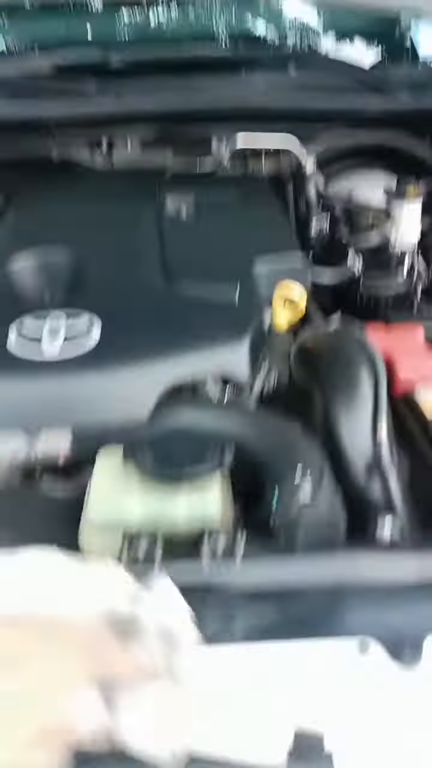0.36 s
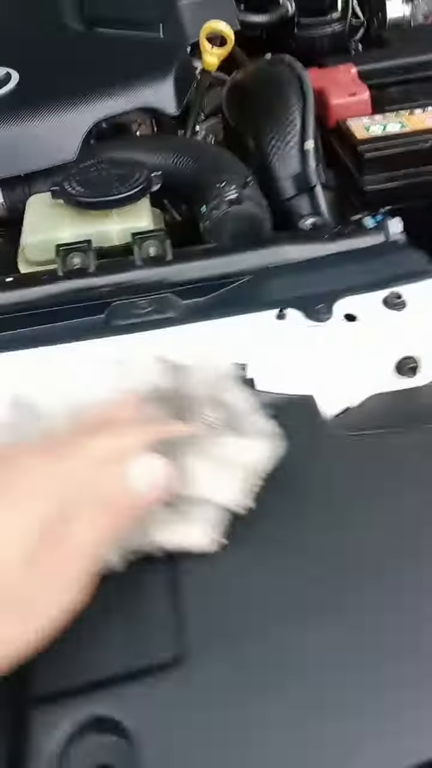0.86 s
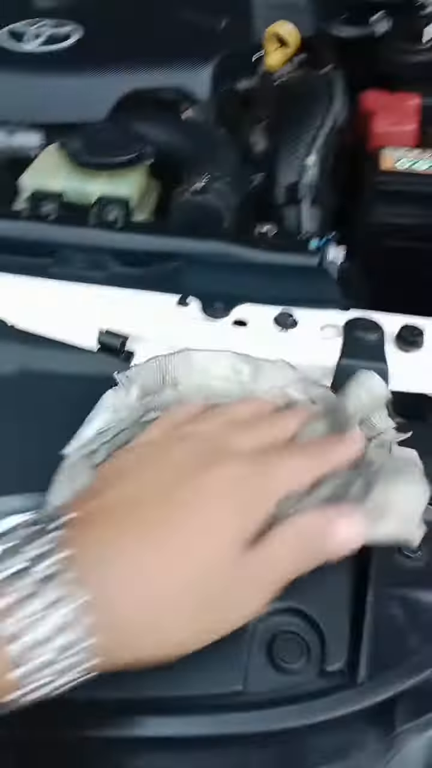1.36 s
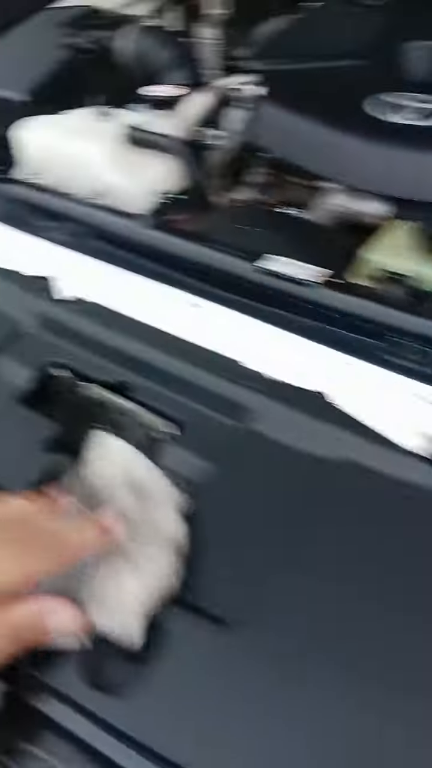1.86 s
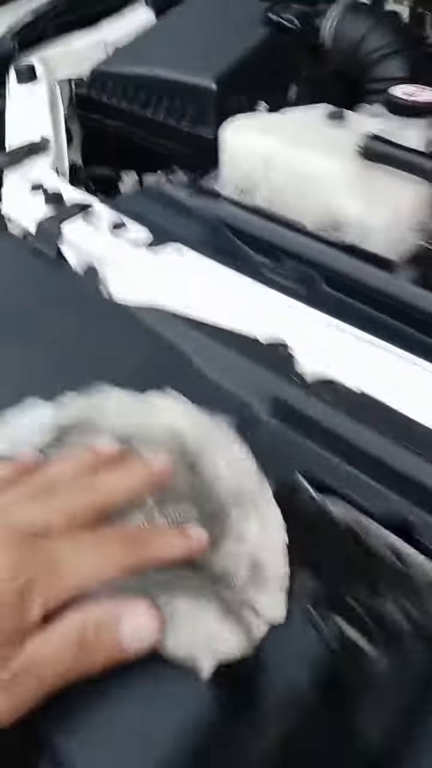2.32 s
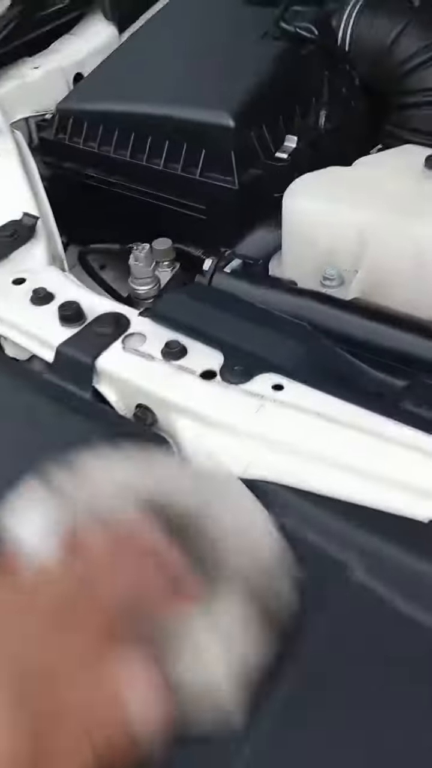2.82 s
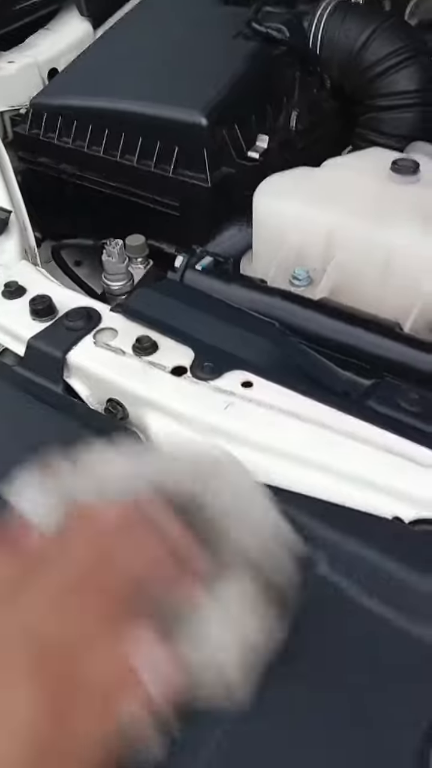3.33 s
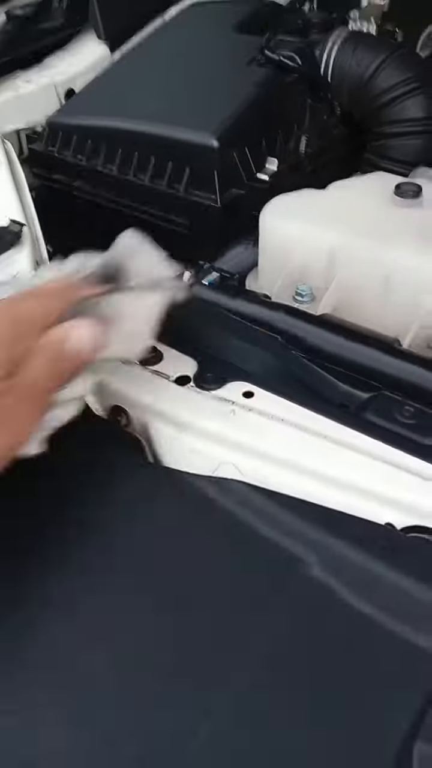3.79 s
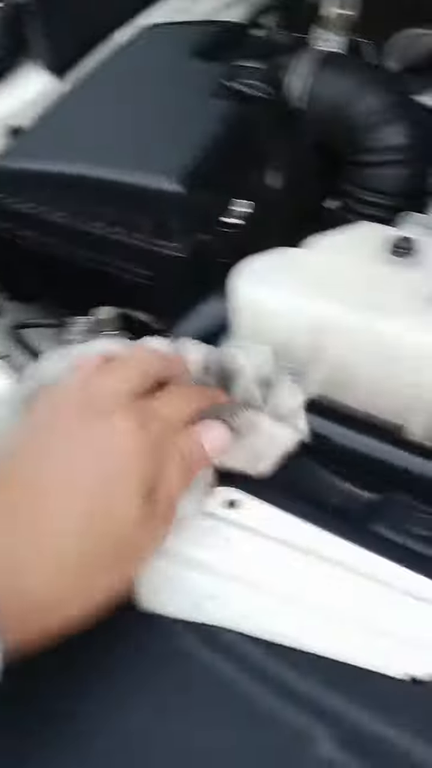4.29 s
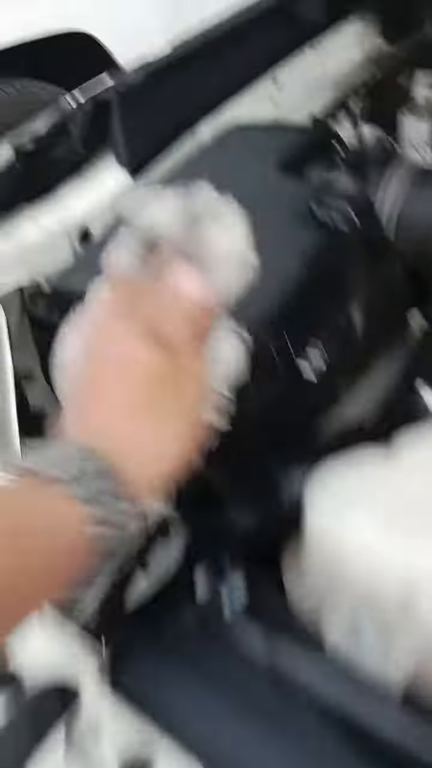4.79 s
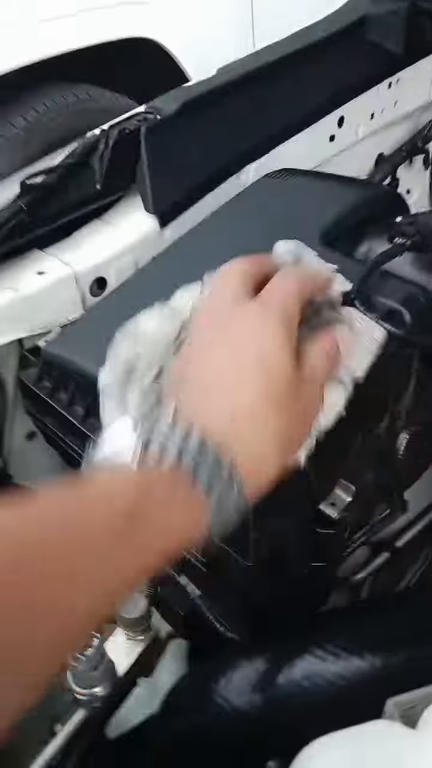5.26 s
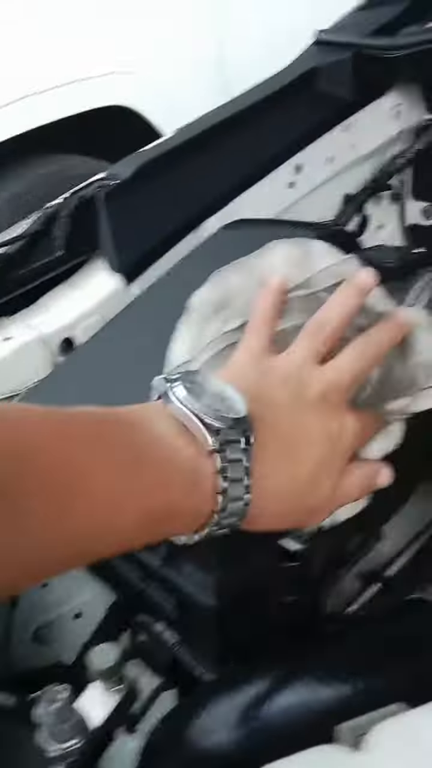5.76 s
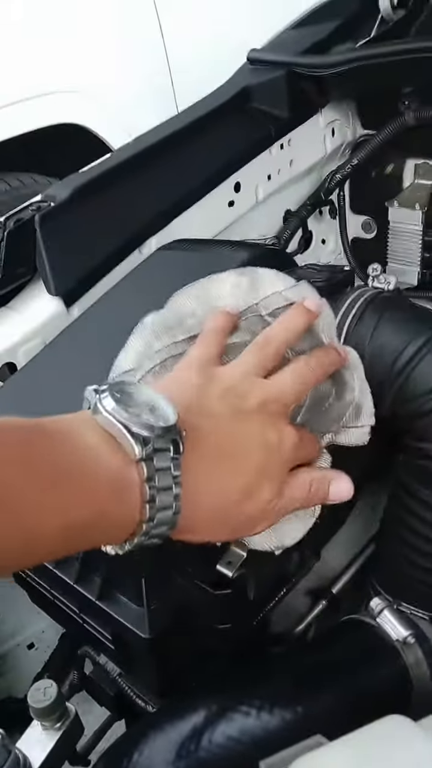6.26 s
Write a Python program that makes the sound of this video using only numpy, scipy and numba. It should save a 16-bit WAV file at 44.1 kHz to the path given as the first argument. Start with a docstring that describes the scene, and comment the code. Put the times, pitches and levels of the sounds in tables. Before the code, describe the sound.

A hand with a loose steel watch strap rubs cloth over hard plastic, heard close on one microphone outdoors. One soft wipe, a lull, a low padded bump, then brisk, scratchy back-and-forth rubs with a slight hollow panel tone. A few weaker rubs lead to a loud bright click and small knock. The rest is quiet: faint metallic ticks, whispery fibres, light handling thumps and far traffic rumble.

```python
"""A hand wipes a cloth over plastic covers in an open engine bay, outdoors, on one mono microphone.
Fibres catching and slipping are random clicks through resonances of the plastic; the panel rings along.
The hand bumps the cover now and then: short noisy contacts shake its modes. A steel watch strap ticks
in short bright decaying sines with a rustle of noise after them. Far traffic rumbles below in slowly
flickering bands of noise, with a thin whine and short low thumps of handling."""
import sys
import numpy as np
from scipy import signal
from scipy.io import wavfile
from numba import njit

SR = 44100
rng = np.random.default_rng(int(sys.argv[2]) if len(sys.argv) > 2 else 0)


def output_pcm(signal):
    """Save a mono or channel-first signal as 16-bit PCM at the path in sys.argv[1].

    Samples are clipped to [-1, 1] before scaling.
    """
    pcm = np.clip(np.atleast_2d(signal).T, -1, 1) * 32767
    wavfile.write(sys.argv[1], SR, np.round(pcm).astype(np.int16))


def invert_db(x):
    """Field ratio 10**(x/20) for x, a level in decibels (scalar or array-like)."""
    u = np.asarray(x, float) / 20
    return 10 ** u


N = 281358


def rms_one(x):
    """Scales a sound to rms 1."""
    return x / np.sqrt(np.mean(x ** 2) + 1e-20)


def peak_one(x):
    """Scales a sound to peak 1."""
    return x / np.max(np.abs(x))


def in_time(rows):
    """Joins the rows of a table by straight lines over the scene; the first column is the time in s."""
    s, *columns = np.transpose(rows)
    return [np.interp(np.arange(N) / SR, s, column) for column in columns]


def drift(rate_hz):
    """Slow chance with rms 1: noise through two equal low-pass poles at rate_hz, one value per 128 samples."""
    r = np.exp(-2 * np.pi * rate_hz * 128 / SR)
    settle = 800
    noise = rng.standard_normal(N // 128 + 2 + settle)
    slow = rms_one(signal.lfilter([1], [1, -2 * r, r * r], noise)[settle:])
    return np.interp(np.arange(N) / 128, np.arange(len(slow)), slow)


def cut(x, hz, kind, order=2):
    """A Butterworth filter."""
    return signal.sosfilt(signal.butter(order, hz, kind, fs=SR, output="sos"), x)


def resonate(x, hz, width_hz):
    """A two-pole resonance with gain 1 on top."""
    r = np.exp(-np.pi * width_hz / SR)
    gain = (1 - r * r) / 2
    return signal.lfilter(np.array([1, 0, -1]) * gain, [1, -2 * r * np.cos(2 * np.pi * hz / SR), r * r], x)


def ring(force, hz, t60):
    """A unit click sets a decaying sine of starting height 1 ringing."""
    r, w = invert_db(-60 / (t60 * SR)), 2 * np.pi * hz / SR
    return signal.lfilter([0, np.sin(w)], [1, -2 * r * np.cos(w), r * r], force)


@njit
def glide(x, hz, r, sr):
    """A resonance whose centre moves; r is its pole radius."""
    y = np.zeros(len(x))
    for i in range(2, len(x)):
        y[i] = x[i] - x[i - 2] + 2 * r * np.cos(2 * np.pi * hz[i] / sr) * y[i - 1] - r * r * y[i - 2]
    return y


# far traffic: start_s, rumble_db (below 200 Hz), murmur_db (200 to 700 Hz)
TRAFFIC = [(0, -59, -59.5), (.3, -60, -61.5), (.6, -64, -67.5), (1.2, -68.5, -66), (1.9, -68, -71),
           (2.6, -63, -63.5), (3.3, -61.5, -67), (3.9, -65, -65.5), (4.5, -62.5, -67), (5.1, -68.5, -70.5),
           (5.7, -65, -70), (6.38, -65, -72.5)]
# short low thumps as the hand or the microphone is handled: peak_s, peak_db
THUMPS = [(.39, -60.5), (.72, -58.5), (.86, -55.5), (2.04, -62), (2.36, -50), (3.33, -57), (3.47, -62),
          (3.68, -60), (4.189, -54), (4.43, -57.5), (4.63, -65), (5.169, -57), (5.821, -56.5), (6.23, -64)]
THUMP_S = 0.025   # half width
# colour of the far noise: pitch_hz, level_db (relative, within rumble, murmur or air)
AIR_COLOUR = [(24, -53.5), (40, -20.5), (81, -7), (144, -15), (290, -13.5), (320, -21), (345, -12.5),
              (646, -21.5), (1680, -25), (2210, -40.5), (2910, -37.5), (4030, -48), (5050, -44),
              (8550, -49), (16000, -80)]
AIR_DB = -73.5   # level of the air above 700 Hz
WHINE_HZ, WHINE_WIDTH_HZ, WHINE_DB = 2840, 42.8, -87


def outdoors(patchy_db=3.0):
    """Far noise in flickering third-octave bands, the lowest also shaped into thumps; a whine of uneven level."""
    t = np.arange(N) / SR
    rumble_db, murmur_db = in_time(TRAFFIC)
    thumps = sum(invert_db(db) * np.exp(-((t - s) / THUMP_S) ** 2) for s, db in THUMPS)
    colour_hz, colour_db = np.transpose(AIR_COLOUR)
    edges = 25 * 2 ** np.arange(0, 9.4, 1 / 3)
    white = rng.standard_normal((2, N))   # neighbouring bands take turns at the two noises
    groups = np.zeros((3, N))
    for k, (low, high) in enumerate(zip(edges, edges[1:])):
        hz = np.sqrt(low * high)
        level_db = np.interp(np.log(hz), np.log(colour_hz), colour_db)
        band = cut(white[k % 2], [low, high], "band")
        groups[int(hz > 200) + int(hz > 700)] += invert_db(level_db + patchy_db * drift(10)) * band
    low_noise, murmur, air = (rms_one(group) for group in groups)
    whine = resonate(resonate(white[0], WHINE_HZ, WHINE_WIDTH_HZ), WHINE_HZ, WHINE_WIDTH_HZ)
    whine = invert_db(WHINE_DB + 3.3 * drift(8.9)) * rms_one(whine)
    rumble_and_thumps = np.hypot(invert_db(rumble_db), thumps) * low_noise
    return rumble_and_thumps + invert_db(murmur_db) * murmur + invert_db(AIR_DB) * air + whine


# strap links touching: start_s, peak_db (before the high-pass), low_modes_db (lift of the low link modes)
TICKS = [(0.013, -23.5, -12), (0.39, -54.5, 3), (0.8456, -58, -1), (1.1372, -40.5, -8), (1.3593, -48, -17),
         (2.3024, -60, -10), (2.3126, -42, -18), (2.4167, -40, -8), (2.4256, -18, -9), (2.9796, -39.5, -22),
         (3.7434, -60, -30), (3.8653, -42, 7), (3.957, -30.5, -3), (4.0164, -42, -3), (4.024, -58, -4),
         (4.201, -35, -2), (4.3397, -41.5, -11), (4.3735, -36.5, -11), (4.3883, -10, -12),
         (4.4867, -52, -1), (4.4995, -63, 1), (4.5331, -67, -10), (4.561, -63, -20), (4.6325, -41, -24),
         (4.6838, -44, -29), (4.6964, -64, -21), (4.916, -49, -7), (5.0589, -60, -2), (5.178, -44, -12),
         (5.319, -60, -2), (5.353, -56, -21), (5.3604, -57, -21.5), (5.515, -50, -5), (5.5582, -49, -8),
         (5.5817, -39, -1), (5.591, -35.5, -21), (5.595, -36.5, -14), (5.675, -43, 1), (5.679, -35.5, -15),
         (5.684, -39, -7), (5.8268, -73, -1)]
# modes of a link: pitch_hz, level_db (relative), t60_s (before RING_STRETCH)
LINK_LOW = [(5100, -7, 0.0077), (5840, 1.5, 0.012), (6760, 10, 0.0067), (7630, 1.5, 0.00527)]
LINK_HIGH = [(9000, -11.5, 0.0042), (10320, -14.5, 0.0049), (11470, -3.5, 0.0055), (12110, 1.5, 0.00458),
             (12860, -1.5, 0.0044), (14260, 2, 0.0057), (15290, -7, 0.008)]
TICK_LENGTH, RING_STRETCH = 3000, 0.92   # samples; factor on every t60
RUSTLE_DB, RUSTLE_REF_DB = -58, -45   # rustle level after a tick of the reference peak
RUSTLE_FOLLOWS, RUSTLE_T60_S = 0.45, 0.075   # dB of rustle per dB of tick; decay


def strap():
    """Each touch of two links rings short bright modes; loose neighbours rustle after it."""
    out, t = np.zeros(N + TICK_LENGTH), np.arange(TICK_LENGTH) / SR
    luck = rng.normal(0, 1, (len(TICKS), 10))
    noise = rng.standard_normal((len(TICKS), TICK_LENGTH))
    low_noise, high_noise = resonate(noise, 8600, 910), cut(noise, 5900, "high")
    rise = 1 - np.exp(-t / 0.00044)
    for k, (s, peak_db, low_db) in enumerate(TICKS):
        modes = [(hz, db + low_db, t60) for hz, db, t60 in LINK_LOW] + LINK_HIGH[:6]   # ten modes sound
        tick = 0
        for (hz, db, t60), chance in zip(modes, luck[k]):
            # chance moves both level and pitch of a mode
            decay = invert_db(db + 6.3 * chance - 60 * t / (t60 * RING_STRETCH))
            tick = tick + decay * np.sin(2 * np.pi * hz * (1 + 0.012 * chance) * t)
        rustle_db = RUSTLE_DB + RUSTLE_FOLLOWS * (peak_db - RUSTLE_REF_DB)
        rustle = high_noise[k] + invert_db(low_db + 8.0) * low_noise[k]
        rustle = invert_db(rustle_db - 60 * t / RUSTLE_T60_S) * rustle
        out[round(s * SR):][:TICK_LENGTH] += invert_db(peak_db) * peak_one(rise * tick) + rise * rustle
    return cut(out[:N], 4080, "high")


BUMP_LENGTH, CONTACT_RISE_S = 16000, 0.00072   # samples; s
PUSH_HZ, PUSH_T60_S = 75.3, 0.387
CRACK_DB = -9   # re the knock's peak


def blows(rows, modes, thud_db):
    """A sharp first touch and a rough contact of a few ms shake the modes; the whole cover gives a low push."""
    out, t = np.zeros(N + BUMP_LENGTH), np.arange(BUMP_LENGTH) / SR
    luck = rng.normal(0, 1, (len(rows), len(modes)))
    first_touch = 0.13 * np.exp(-t * SR)
    for (s, peak_db, contact_s, bright_db, push_db), chances in zip(rows, luck):
        rough = rng.standard_normal(BUMP_LENGTH) * np.exp(-(t / contact_s) ** 2)
        rough = rough * (1 - np.exp(-t / CONTACT_RISE_S))
        force = rough / np.sqrt(np.sum(rough ** 2)) + first_touch
        knock = 0
        for (hz, db, t60), chance in zip(modes, chances):
            # a harder contact lifts the upper modes
            mode_db = db + bright_db * np.log2(hz / 1000) + 1.4 * chance
            knock = knock + invert_db(mode_db) * peak_one(ring(force, hz, t60))
        knock = peak_one(cut(knock, 216, "high", order=4))
        # the contact itself is heard as a broad dry crack and a dull thud of cloth
        crack = peak_one(cut(cut(force, 885, "high"), 5650, "low", order=4))
        crack = invert_db(CRACK_DB + 1.2 * min(bright_db, 0)) * crack
        thud = invert_db(thud_db) * peak_one(cut(force, [420, 1500], "band"))
        push = invert_db(push_db - 60 * t / PUSH_T60_S) * np.sin(2 * np.pi * PUSH_HZ * t)
        push = (1 - np.exp(-t / 0.034)) * push
        out[round(s * SR):][:BUMP_LENGTH] += invert_db(peak_db) * (knock + crack + thud) + push
    return out[:N]


# the hand meets the middle of the cover (BUMPS) or its stiff edge (KNOCKS):
# start_s, peak_db (of the modes), contact_s, brightness_db (per octave), push_db (before its slow rise)
BUMPS = [(2.245, -38, 0.0055, 2, -54), (2.2526, -17.5, 0.0099, 1, -36), (2.273, -29, 0.0069, 0, -55),
         (2.285, -28, 0.0093, -1, -32.5), (2.293, -32, 0.0068, -13, -58), (2.3, -33.5, 0.0064, -2, -54),
         (2.314, -35.5, 0.013, -5, -55)]
KNOCKS = [(3.848, -51.5, 0.0089, 4, -57), (4.269, -61, .005, 4, -64), (4.3582, -21, 0.0018, 7.5, -54),
          (4.362, -23, .010, -0.5, -62), (4.378, -35.5, .005, -3, -62.5), (4.585, -74, .005, -7, -63),
          (4.891, -53.5, 0.0057, 8, -61)]
# modes of the cover's middle and of its edge: pitch_hz, level_db (relative), t60_s (for a blow)
PANEL = [(251, -9, 0.06), (312, -6.5, 0.075), (487, -5.5, 0.04), (542, 3.5, 0.045), (618, -10.5, 0.029),
         (725, -4.5, 0.042), (913, -9.5, 0.065), (1080, 4, 0.02), (1350, 3.5, 0.03), (1652, -2.5, 0.024),
         (1976, -7.5, 0.037), (3040, -9, 0.014), (3370, -1, 0.019), (5040, -15, 0.031), (5460, -11, 0.037),
         (6170, -8, 0.0055), (7700, -42, .02)]
EDGE = [(229, -26, .04), (322, -16, 0.055), (620, -7, 0.071), (750, -1.5, 0.0295), (1110, 0, 0.064),
        (1290, -7, .04), (1500, -12, .02), (1813, -7, .03), (2060, -11.5, .02), (2900, -15.5, .015),
        (3420, -13.5, .015), (4720, -20.5, .015), (5830, -14, 0.013), (6060, -15, 0.0095)]
LOW_BODY_DB = 3   # lift of the four lowest panel modes
THUD_DB, EDGE_THUD_DB = -13.5, -21.5   # re the knock's peak


def bumps():
    """Mid-panel blows favour the four lowest modes; the edge has modes of its own."""
    middle = [(hz, db + LOW_BODY_DB, t60) for hz, db, t60 in PANEL[:4]] + PANEL[4:]
    return blows(BUMPS, middle, THUD_DB) + blows(KNOCKS, EDGE, EDGE_THUD_DB)


def slips(per_s, spread_db, clump_db):
    """Fibres catch and let go at random, in clumps, with a few large jerks."""
    sizes = invert_db(spread_db * np.minimum(rng.exponential(1, N), 5)) * rng.choice([-1, 1], N)
    happens = rng.random(N) < per_s / SR
    return rms_one(sizes * happens * invert_db(clump_db * drift(60)))


# strokes of the cloth: start_s, fastest_s, stop_s (at least RELEASE_S after fastest_s),
# rasp_db, panel_db (re rasp), fibres_db (re rasp)
STROKES = [(-.06, 0.16, 0.46, -48.5, -7.5, -7), (0.559, 0.56, 0.65, -62.5, -25, -29),
           (.66, 0.692, 0.7, -70, 0, -2), (0.732, 0.806, 0.89, -64, -21, -14),
           (0.824, 0.865, 0.95, -65.5, -17, -11), (.92, 1.016, 1.47, -68, -3, -13),
           (1.06, 1.136, 1.25, -64.5, -6, -8), (1.197, 1.344, 1.55, -73.5, 4, 5.5),
           (1.34, 1.46, 1.91, -61.5, -12, -3.5), (1.536, 1.727, 1.73, -63.5, -3, -9),
           (2.25, 2.515, 2.625, -40, -8.5, -9), (2.56, 2.63, 2.735, -51, -9.5, -9.5),
           (2.695, 2.881, 2.96, -38.5, -7.5, -10.5), (2.967, 3.092, 3.194, -35, -11, -10.5),
           (3.236, 3.377, 3.48, -38, -9.5, -9.5), (3.496, 3.594, 3.68, -36.5, -21, -7),
           (3.836, 3.859, 3.93, -51.5, -6.5, -14), (3.884, 3.975, 4.05, -47.5, -19, -9.5),
           (4.076, 4.179, 4.23, -47, -13.5, -9.5), (4.252, 4.346, 4.446, -48, -10.5, -8.5),
           (4.355, 4.365, 4.39, -46, -9, -27), (4.387, 4.443, 4.6, -70.5, 11, -24),
           (4.45, 4.49, 4.1, -60.5, -1.5, -26), (4.58, 4.594, 4.38, -71, 16, -7),
           (4.654, 4.695, 4.77, -65, -3, -29), (4.88, 4.92, 4.96, -65, -8, -5),
           (4.94, 4.99, 5.08, -67, -8, -10), (5.285, 5.31, 5.36, -65, -2.5, -16),
           (5.34, 5.365, 5.41, -67, -2.5, -6), (5.81, 5.845, 5.89, -67, 1.5, -12),
           (5.765, 5.781, 4.6, -65, 2.5, -30), (5.97, 5.995, 5.9, -81, -6, -4),
           (6.078, 6.079, 6.2, -69.5, 2, -28), (6.191, 6.212, 6.26, -68.5, 0.5, -16),
           (6.292, 6.298, 6.7, -73.5, 4, -13)]
SPEED_POWER, PANEL_SPEED_POWER, FIBRE_SPEED_POWER = 1.73, 2.26, 1.9   # sound grows as these powers of speed
RELEASE_S, TREMBLE_DB = 0.004, 0.5   # the cloth coasts after the hand stops; the hand is unsteady


def strokes():
    """The hand speeds up and slows down along quarter sines; rasp, panel, fibres follow as powers of speed."""
    t, power = np.arange(N) / SR, np.zeros((3, N))
    for start, fastest, stop, rasp_db, panel_db, fibre_db in STROKES:
        stop = max(stop, fastest + RELEASE_S)
        now = slice(max(round(start * SR), 0), round(stop * SR))
        speed = np.sin(np.pi / 2 * np.interp(t[now], [start, fastest, stop], [0, 1, 0]))
        levels = np.array([speed ** SPEED_POWER,
                           invert_db(panel_db) * speed ** PANEL_SPEED_POWER,
                           invert_db(fibre_db) * speed ** FIBRE_SPEED_POWER])
        power[:, now] += (invert_db(rasp_db) * levels) ** 2
    r = np.exp(-1 / (RELEASE_S * SR))
    coasting = signal.lfilter([1 - r], [1, -r], power)
    return np.sqrt(np.maximum(power, coasting)) * invert_db(TREMBLE_DB * drift(29.0))


LIGHT_DB, FIRM_DB = -59, -44   # rub levels of a fully light and a fully firm touch
LEAST_FIRM_SHARE = 0.32   # the touch is never lighter than this
RIBBED_UNTIL_S, RIBBED_FIRM_SHARE = .5, .45   # the first wipe crosses a part that keeps its narrow modes


def firmness(rub, ribbed):
    """The harder the cloth presses, the more the broad rasp takes over from the narrow modes."""
    firm = np.clip((20 * np.log10(rub) - LIGHT_DB) / (FIRM_DB - LIGHT_DB), 0, 1)
    firm = np.maximum(firm, LEAST_FIRM_SHARE)
    return np.where(ribbed, np.minimum(firm, RIBBED_FIRM_SHARE), firm)


HOP, HOLD_S = 0.025, .06   # spread of the pitch steps as a share of the pitch; mean hold


def hopping(force, hz, width_hz):
    """A narrow mode with random stepped pitch; its resonance is applied twice."""
    hops = np.cumsum(rng.random(N) < 1 / (HOLD_S * SR))
    centre = hz * (1 + HOP * rng.standard_normal(2000)[hops])
    r = np.exp(-np.pi * width_hz / SR)
    return ((1 - r * r) / 2) ** 2 * glide(glide(force, centre, r, SR), centre, r, SR)


def through(modes, force, patchy_db, sharpen=resonate):
    """Parallel resonances of alternating sign, each with a slow random level; rms 1."""
    total = 0
    for k, (hz, width_hz, db) in enumerate(modes):
        total = total + (-1) ** k * invert_db(db + patchy_db * drift(10.2)) * sharpen(force, hz, width_hz)
    return rms_one(total)


# broad modes under a firm touch: pitch_hz, width_hz, level_db (relative)
RASP = [(4500, 660, 2), (4840, 360, 6.5), (5524, 504, 8), (6310, 930, 3), (7920, 1600, -13)]
SCUFF = [(1890, 770, -6), (2593, 280, -1), (3145, 580, 1.5), (3710, 550, -4)]
# narrow modes under a light touch: pitch_hz, width_hz (of each of two passes), level_db (relative)
SQUEAKS = [(4720, 120, -8.5), (5136, 150, 0.5), (5380, 70, -3), (5893, 140, -4), (6405, 263, 0.5),
           (6900, 110, -3.5), (7735, 235, -5.5), (7930, 1300, -14.5)]
LOW_SQUEAKS = [(1853, 36, 4.5), (2460, 90, -15), (2900, 430, -5), (3302, 106, 3.5), (3566, 210, -2),
               (3933, 100, -12.5)]


def rasp_and_scuff(force, firm):
    """The slips sound in broad modes under a firm touch, in narrow modes of stepped pitch under a light one."""
    rasp = firm * through(RASP, force, patchy_db=1.0)
    rasp = rasp + (1 - firm) * through(SQUEAKS, force, patchy_db=3.0, sharpen=hopping)
    scuff = firm * through(SCUFF, force, patchy_db=1.5)
    scuff = scuff + (1 - firm) * through(LOW_SQUEAKS, force, patchy_db=6.0, sharpen=hopping)
    return cut(rasp, 2300, "high"), cut(scuff, 4600, "low")


# hiss of the fibres: pitch_hz, width_hz, level_db (relative)
FIBRES = [(8500, 6100, 0), (12200, 1450, 4.5), (15100, 2700, 5)]
LIGHT_FIBRE_HZ, LIGHT_FIBRE_DB = 11500, 4.5   # a light touch favours the whisper of the finest fibres


def fibre_hiss(force, firm):
    """Fibres hiss high up; under a light touch the finest come forward and flicker."""
    hiss = cut(through(FIBRES, force, patchy_db=0.5), 4200, "high", order=4)
    finest = invert_db(LIGHT_FIBRE_DB + 2.6 * drift(12.0)) * cut(hiss, LIGHT_FIBRE_HZ, "high", order=8)
    return firm * hiss + (1 - firm) * (finest + invert_db(-4.5) * hiss)


def panel_answer(force, panel_hz, firm):
    """The panel answers in one wandering mode, joined by its flickering middle modes when pressed; rms 1."""
    wandering_hz = panel_hz * (1 + 0.065 * drift(12.0))
    narrow = rms_one(glide(force, wandering_hz, np.exp(-np.pi * 100 / SR), SR))   # 100 Hz wide
    narrow = narrow * invert_db(3.8 * drift(16.0) - 7.6 * firm)
    # the rubbed middle modes ring longer than after a blow
    broad = rms_one(sum(invert_db(db + 11.0 * np.tanh(drift(9.4))) * ring(force, hz, 1.4 * t60)
                        for hz, db, t60 in PANEL[4:11]))
    both = narrow + invert_db(-8.0 + 7.26 * firm) * broad
    return rms_one(cut(cut(both, 660, "high"), 2400, "low"))


def cover_drone(force):
    """The three lowest panel modes, equally driven by the slips; rms 1."""
    return rms_one(cut(sum(ring(force, hz, t60) for hz, db, t60 in PANEL[:3]), 110, "high"))


# one narrow mode of the plastic sings for a moment under the dragging cloth; the rows at 4.377 s and 4.38 s #
# are the edge ringing on at 615 and 1380 Hz after the knock at 4.358 s: # start_s, length_s, pitch_hz, level_db
# (before its swell and fade)
SINGS = [(0, 0.071, 1420, -60.5), (0.06, 0.079, 3135, -63), (0.084, 0.27, 1400, -56.5),
         (0.124, 0.082, 1990, -64), (0.183, 0.048, 2640, -63), (.22, 0.12, 1630, -60),
         (0.325, 0.11, 2730, -70), (1.038, 0.17, 1283, -68.5), (1.136, 0.031, 4590, -68),
         (1.428, 0.085, 1330, -66), (1.517, 0.15, 1235, -63.5), (1.61, 0.19, 1824, -66.5),
         (1.626, 0.18, 2900, -73), (1.73, 0.052, 3730, -65), (1.706, 0.12, 1380, -72),
         (2.36, 0.24, 1296, -60), (2.629, 0.11, 607, -62), (2.756, 0.092, 970, -63),
         (2.81, 0.13, 694, -55.5), (2.842, 0.085, 1294, -47.5), (2.913, 0.027, 1210, -49),
         (3.03, 0.15, 1294, -56), (3.04, 0.1, 810, -59), (3.3, 0.17, 1000, -53.5), (3.333, 0.13, 1370, -54),
         (3.387, 0.094, 620, -59), (3.54, 0.079, 1020, -57), (3.577, .09, 1380, -56.5),
         (3.841, .04, 870, -56), (3.858, 0.19, 1350, -63.5), (4.107, 0.088, 1310, -63),
         (4.275, 0.16, 1290, -62), (4.329, 0.033, 1270, -48.5), (4.377, 0.027, 615, -41.5),
         (4.38, 0.019, 1380, -46.5), (4.42, 0.051, 1350, -57.5)]
SING_WIDTH_HZ = 90


def sings(force):
    """Each mode, two resonances in a row, swells and fades within its row's length."""
    out = np.zeros(N)
    for s, length, hz, db in SINGS:
        now = slice(round(s * SR), round((s + length) * SR))
        tone = rms_one(resonate(resonate(force[now], hz, SING_WIDTH_HZ), hz, 2 * SING_WIDTH_HZ))
        swell = np.sqrt(np.sin(np.linspace(0, np.pi, len(tone))).clip(0))
        out[now] += invert_db(db) * tone * swell
    return out


# steady rub and panel level under the whole scene, during strokes as well as between them:
# start_s, rasp_db, panel_db, panel_pitch_hz
STEADY = [(0, -51.5, -54, 1426), (.2, -51.5, -78, 1367), (.3, -56, -64, 1670), (.5, -69.5, -73.5, 1120),
          (.78, -67.5, -69, 986), (1.1, -73, -74, 1290), (1.7, -63, -71, 1350), (1.83, -74.5, -73.5, 1350),
          (2.2, -72.5, -75, 1330), (2.45, -84.5, -93, 1286), (2.9, -51.5, -50.5, 1330),
          (3.1, -76, -77, 1374), (3.24, -59.5, -65, 1020), (3.35, -65, -58, 1370),
          (3.47, -64.5, -62.5, 1015), (3.62, -42, -55.5, 1400), (3.78, -76.5, -70, 960),
          (4.0, -72, -71, 1323), (4.3, -69.5, -66.5, 1300), (4.37, -58, -40, 1250), (4.44, -65, -72, 1325),
          (4.75, -70, -69, 1386), (5.2, -69.5, -71, 1403), (5.7, -74, -71, 1580), (6.38, -80, -73.5, 1450)]
STEADY_SCUFF_DB, STEADY_FIBRE_DB = -7, -22   # re steady rasp
SCUFF_DB, LIGHT_SCUFF_DB = -4.5, -6.5   # re rasp in a stroke; a light stroke scuffs less
COVER_DRONE_DB = -25.5   # re rasp in a stroke


def wiping():
    """One slip train drives rasp, scuff and hiss; the panel answers around a pitch set by where the hand presses."""
    steady_db, steady_panel_db, panel_hz = in_time(STEADY)
    stroke, stroke_panel, stroke_fibre = strokes()
    steady = invert_db(steady_db + 2.0 * drift(2.6))
    rub = np.hypot(stroke, steady)
    force = slips(per_s=14000, spread_db=2.0, clump_db=1.0)
    ribbed = np.arange(N) / SR < RIBBED_UNTIL_S
    firm = firmness(rub, ribbed)
    rasp, scuff = rasp_and_scuff(force, firm)
    stroke_scuff = invert_db(SCUFF_DB + LIGHT_SCUFF_DB * (1 - firm) * ~ribbed) * stroke
    scuff_level = np.hypot(stroke_scuff, invert_db(STEADY_SCUFF_DB) * steady)
    fibre_level = np.hypot(stroke_fibre, invert_db(STEADY_FIBRE_DB + 5.4 * drift(15.0)) * steady)
    panel_level = np.hypot(stroke_panel, invert_db(steady_panel_db))
    plastic = rub * rasp + scuff_level * scuff + sings(force)
    panel = panel_level * panel_answer(force, panel_hz, firm)
    drone = invert_db(COVER_DRONE_DB) * stroke * cover_drone(force)
    return plastic + panel + drone + fibre_level * fibre_hiss(force, firm)


def scene():
    """Far traffic with handling thumps, strap, bumps and the wiping cloth, in one channel."""
    return (outdoors() + strap() + bumps() + wiping())[None]


def band_limit(x):
    """A steep low-pass at the top of the band."""
    return signal.sosfilt(signal.butter(12, 16800, fs=SR, output="sos"), x)


def record(dry):
    """The top is cut steeply, 30 dB down from just below 16 kHz."""
    top_cut = signal.cheby2(10, 30, 15918.5, fs=SR, output="sos")
    mix = signal.sosfilt(top_cut, dry)
    return band_limit(mix)


dry = scene()
out = record(dry)
output_pcm(out)
```